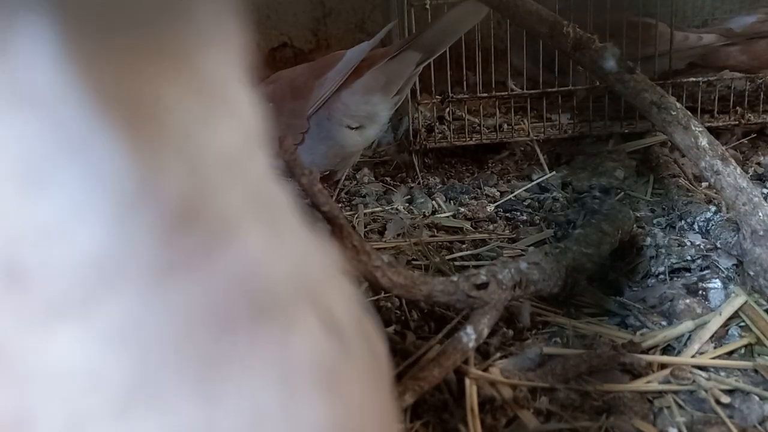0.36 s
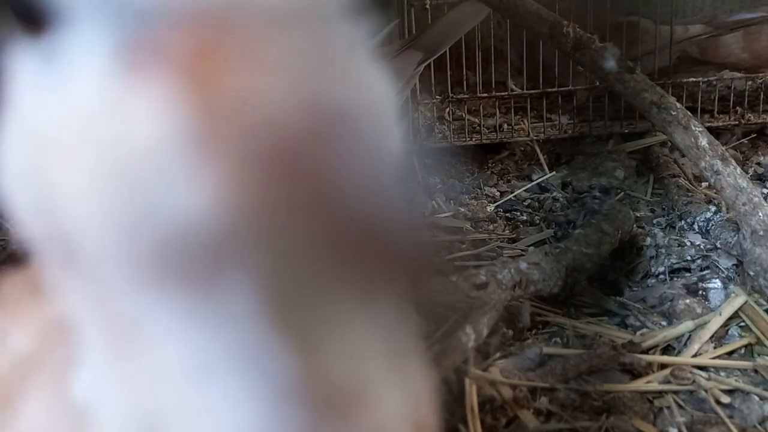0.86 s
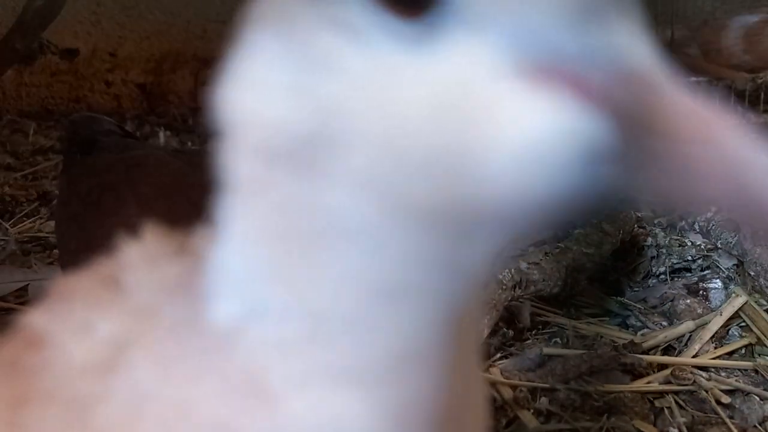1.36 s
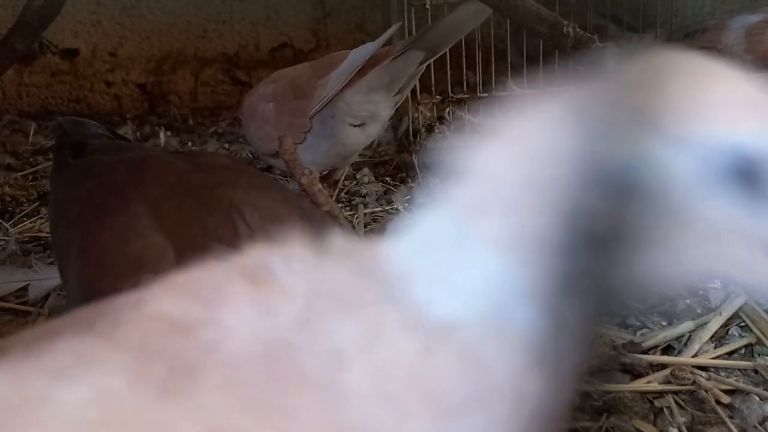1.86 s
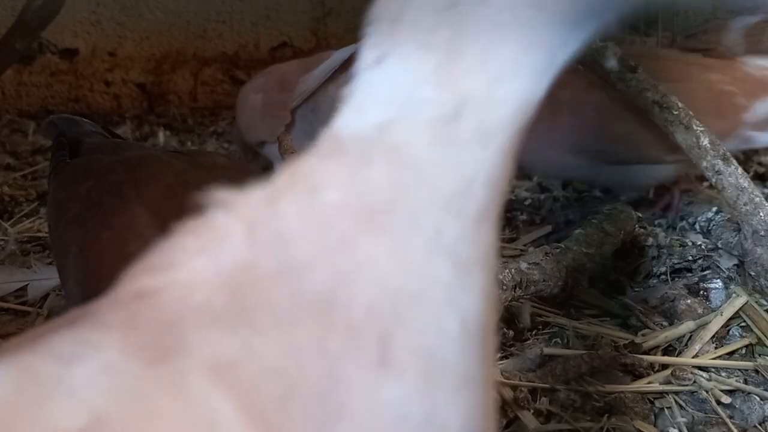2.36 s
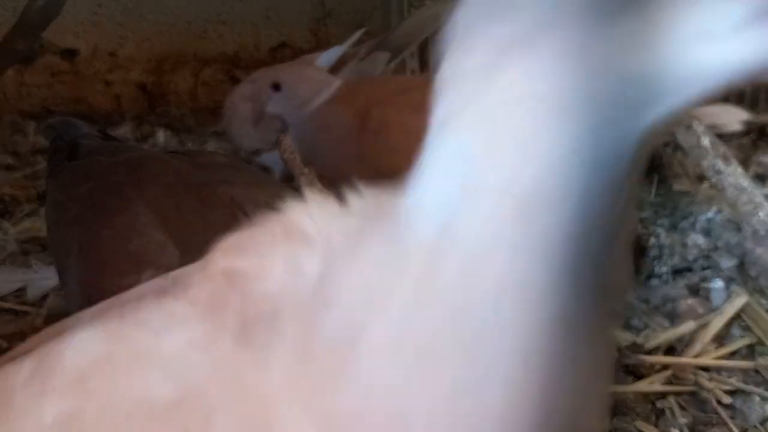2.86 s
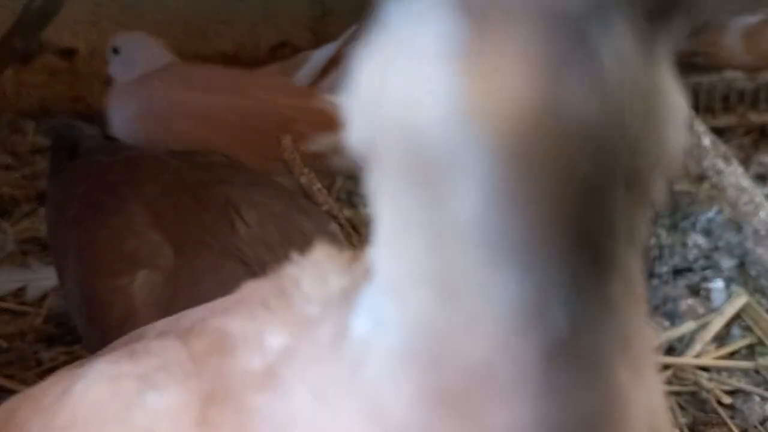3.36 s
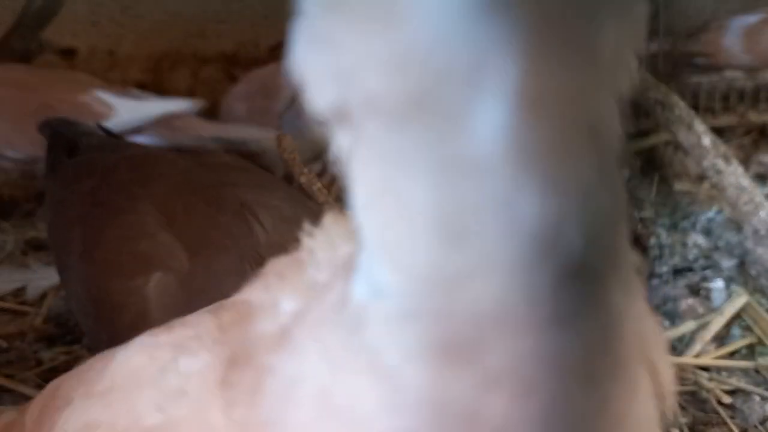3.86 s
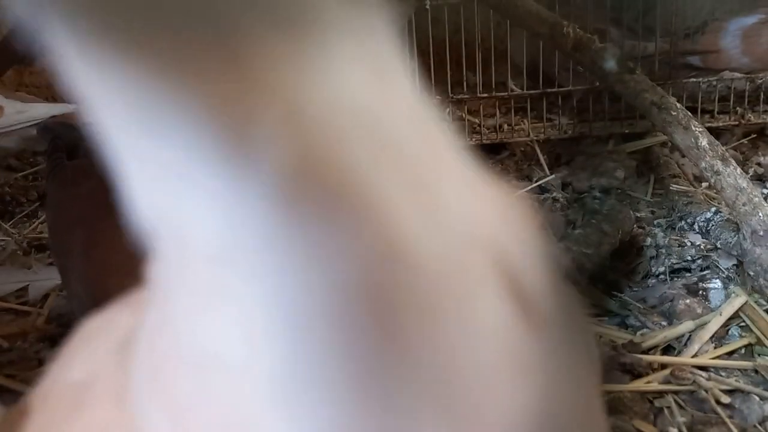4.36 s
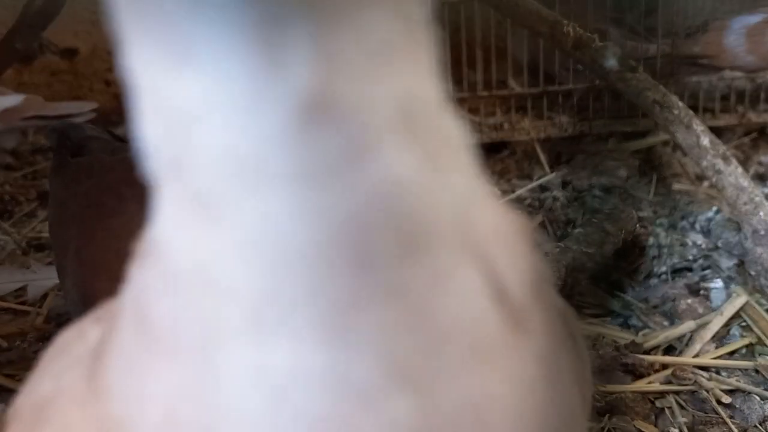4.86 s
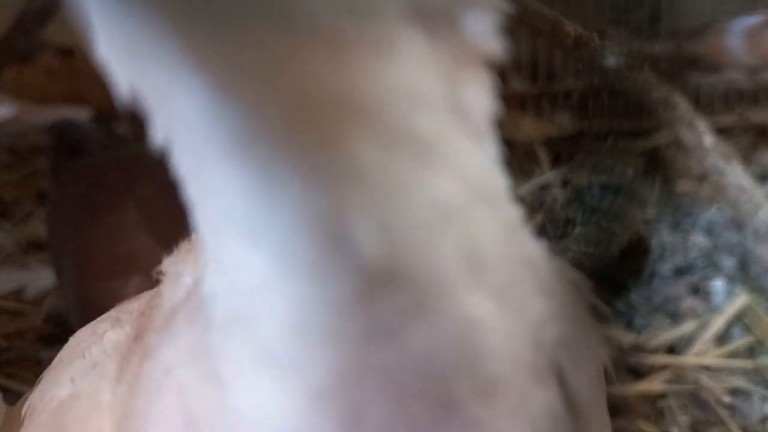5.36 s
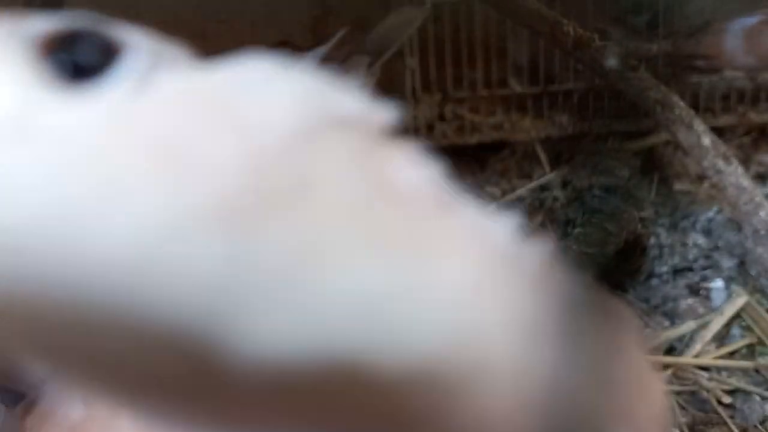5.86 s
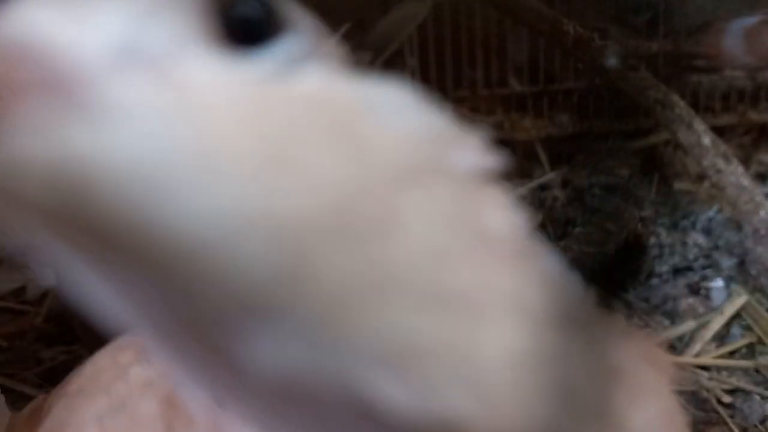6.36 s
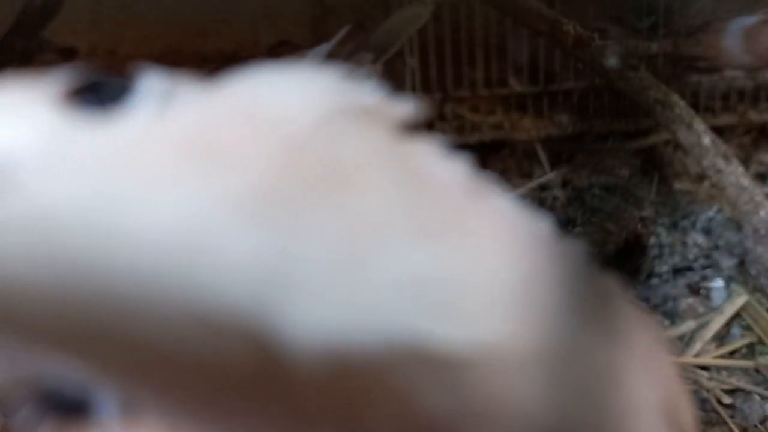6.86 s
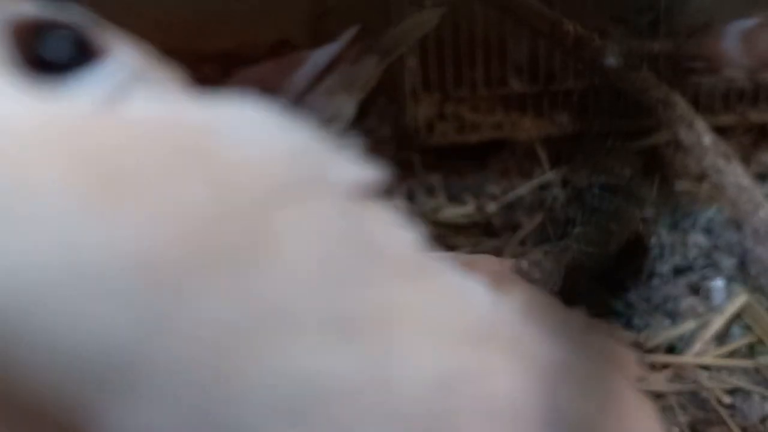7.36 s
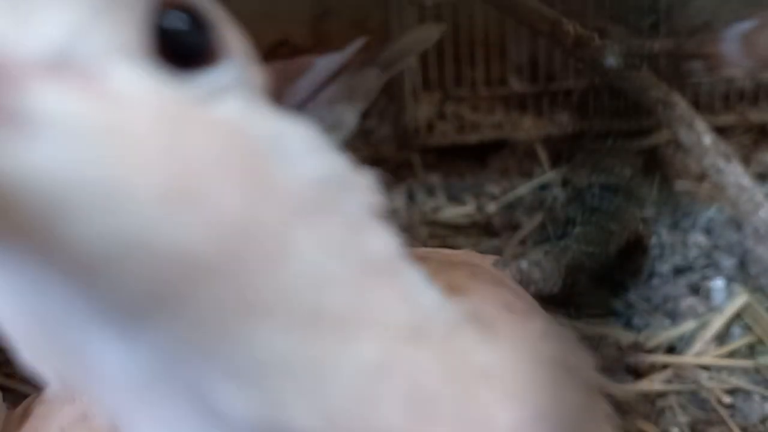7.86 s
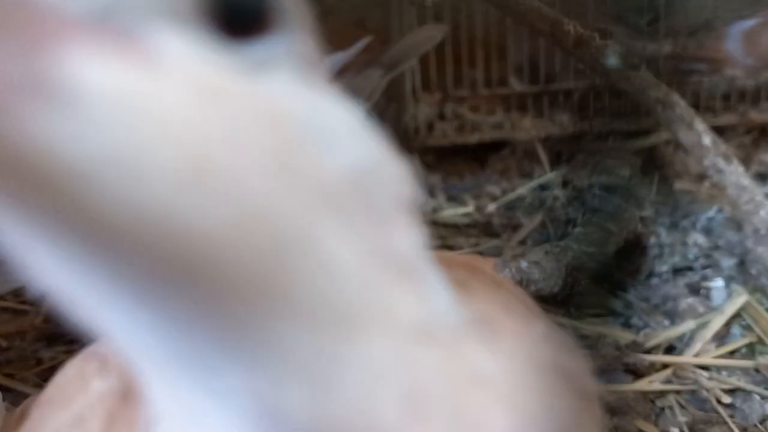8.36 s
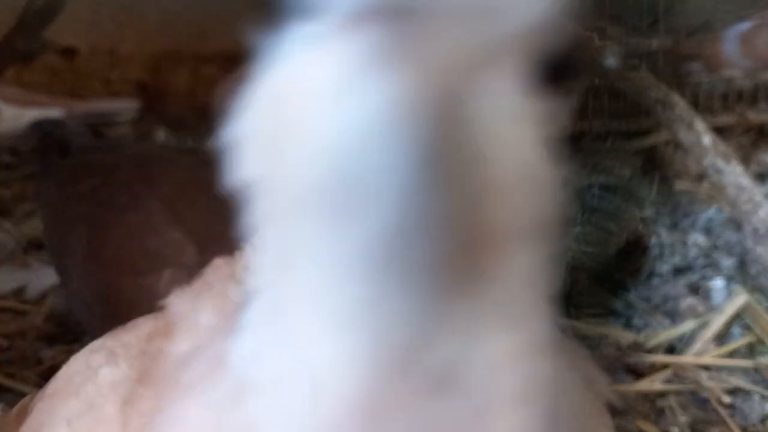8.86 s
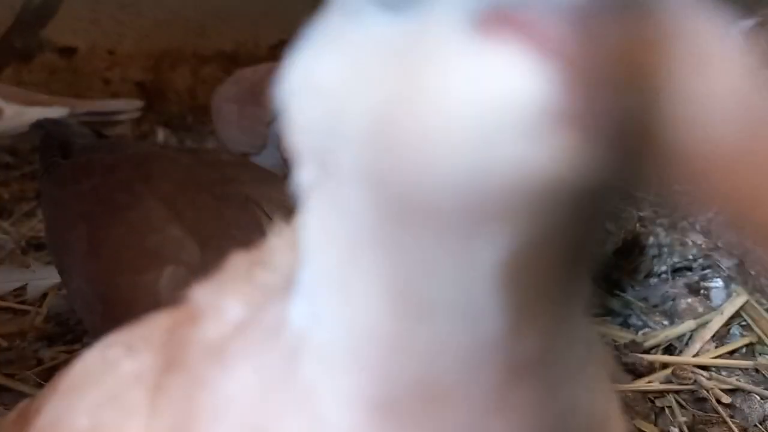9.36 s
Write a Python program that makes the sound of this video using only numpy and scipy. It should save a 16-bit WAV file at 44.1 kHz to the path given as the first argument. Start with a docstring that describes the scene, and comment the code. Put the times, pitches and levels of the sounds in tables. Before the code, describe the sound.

In a small straw-littered coop, a dove coos right at the microphone in a steady cycle of hoarse short note and rolling, whistling, falling coo. Feet and feathers tick and rustle in straw, with a sharp rustle and wooden knocks just before the second coo. Soft low coos from other birds and a few tiny chirps lie behind; faint hiss rises with each call and the background drops in pauses.

```python
"""A dove right at the microphone repeats a short hoarse note and a long coo that rolls, whistles high, dips and
sinks: a near sine, partly chopped into pulses, rings two resonances of the swollen throat. Further off, gliding
sines make pigeons' low coos and small birds' chirps. Feet and feathers tick and rustle in dry straw (noise bursts
and bands), hiss rises with the calls, knocks ring the modes of the perch, and coloured noise is the air of coop
and street. A noise gate turns the lower range down in pauses."""
import sys
import numpy as np
from scipy import signal
from scipy.io import wavfile
from scipy.ndimage import uniform_filter1d

SR = 44100
rng = np.random.default_rng(int(sys.argv[2]) if len(sys.argv) > 2 else 0)


def invert_db(level):
    """Linear amplitude ratio for a level in decibels (20 dB per decade), elementwise."""
    return 10 ** (np.asarray(level, dtype=float) / 20)


def store_pcm(level_fs):
    """Save levels as 16-bit WAV."""
    pcm = np.round(np.clip(level_fs, -1, 1) * 32767).astype(np.int16)
    wavfile.write(sys.argv[1], SR, np.atleast_2d(pcm).T)


N = 429524

# Short notes. Each row: start in seconds, length in seconds, dB added to the shape's effort.
NOTES = [(.303, .31, 0.5), (3.132, 0.29, 0.5), (5.943, .283, 1.5), (8.671, 0.31, 0)]
# Long coos. Each row: roll start in seconds, first pulse rate in pulses per second, then whistle, dip, swell,
# sinking and end times in seconds; in the last row those after the whistle lie past the end of the sound and
# are arbitrary.
COOS = [(.855, 48.8, 1.402, 1.659, 1.738, 1.982, 2.205), (3.69, 49.2, 4.27, 4.497, 4.577, 4.843, 5.015),
        (6.488, 50.6, 7.09, 7.321, 7.412, 7.636, 7.833), (9.207, 49, 9.81, 10.26, 10.05, 10.72, 10.65)]
# Shape of the short note. Each row: share of its length 0-1, pitch in Hz, effort in dB, share of each pulse
# that sounds 0-1.
NOTE_SHAPE = [(0, 452, -79, 0.75), (.04, 490, -33.5, 0.82), (.08, 561, -29, 0.85), (.12, 689, -25.5, 1),
              (.195, 702, -23.5, .95), (.225, 801, -22.5, .88), (.33, 779, -29.5, .9),
              (.365, 694, -18.5, .9), (.45, 671, -23, .84), (.66, 650, -22, .66), (.88, 643.5, -24.5, .66),
              (.945, 564.2, -39, .66), (1, 533, -57.5, 0.64)]
# Shape of the coo. Each row: stage (0-1 roll, 1-2 whistle, 2-3 dip, 3-4 swell, 4-5 sinking), pitch in Hz,
# effort in dB, share of each pulse that sounds 0-1.
COO_SHAPE = [(0, 515, -43.5, 0.24), (.12, 558.7, -32, 0.28), (.3, 610, -24.5, 0.34),
             (.47, 670, -20.5, 0.31), (.62, 689.2, -20.5, .38), (.72, 720, -23, .52), (.82, 765, -25, .66),
             (.95, 800.8, -25, .74), (1, 769.4, -23.5, .9), (1.13, 807.7, -20.5, 1),
             (1.57, 788.3, -23.5, 1), (1.92, 766.5, -24, 1), (2, 754, -45.5, 1), (2.07, 700.8, -26.5, 1),
             (2.25, 601, -21, 1), (2.45, 500.2, -31, 1), (2.66, 496, -33, 1), (2.82, 544.6, -21, 1),
             (3, 632.8, -20.5, 1), (3.15, 657.2, -21.5, 1), (3.4, 651.8, -21, 1), (3.8, 616.9, -18.5, 1),
             (4, 586.1, -17, 1), (4.055, 538.5, -28.5, 1), (4.36, 508, -28, 1), (4.46, 490, -35, 1),
             (4.62, 441.2, -36.5, .9), (4.7, 448.5, -42, .9), (4.74, 590.1, -41.5, .4), (4.9, 570, -48, .4),
             (5, 560, -72, .4)]
# Throat resonances. Each row: centre in Hz, width in Hz, level in dB, left minus right in dB, samples by which
# left lags.
THROAT = [(543.3, 23.94, 8.5, -2.5, 2.7), (660.3, 134.4, -7.5, 4.5, 9)]
# Overtones before muffling. Each row: multiple of the pitch, dB relative to effort at 800 Hz, power of pitch by
# which it grows.
OVERTONES = [(2, -39.5, -1.3), (3, -43.5, 14), (4, -46, 9), (5, -60, 9), (6, -47.5, 12), (7, -67, 0.1),
             (8, -66, 8.2)]
# Other birds, a gliding call a row. Each row: start in seconds, length in seconds, first Hz, last Hz,
# level in dB before wavering.
OTHERS = [(0, 0.18, 290, 353, -55), (0.128, 0.24, 340, 256, -43), (1.829, .24, 340.4, 243, -42),
          (2.197, 0.13, 569, 565, -59), (2.453, 0.39, 565, 570, -60), (2.882, 0.24, 556, 547, -60.5),
          (2.95, 0.42, 300, 329, -55), (3.869, 0.21, 335, 289.5, -52.5), (5.469, 0.16, 446, 408, -53.5),
          (5.479, 0.1, 1150, 1123, -49.5), (5.736, .12, 372, 256, -50), (8.08, 0.11, 5850, 5550, -79),
          (8.25, .09, 5020, 4980, -77), (8.649, 0.11, 5150, 4590, -79), (9.499, 0.29, 248.7, 284.6, -50)]
# Ticks in the straw, levels before band trims. Each row: start in seconds, peak in dB, dB near 1.6 kHz,
# dB near 11 kHz, left minus right in dB.
TICKS = [(0.2232, -49.5, -55.5, -64.5, 1), (0.2676, -40, -45, -55, 0), (0.39, -39, -44, -58.5, -2.5),
         (0.533, -50, -57.5, -67.5, 1), (0.7458, -49, -87, -62.5, -3), (0.9444, -49, -68, -70.5, 2.5),
         (1.4845, -35, -39.5, -54.5, -1), (1.6116, -45, -71.5, -63.5, 0.5),
         (1.8481, -42, -61.5, -46.5, -8.5), (2.0231, -37.5, -57.5, -56, 1), (2.2242, -38, -85.5, -59.5, 1),
         (2.3464, -51, -64, -59.5, -5.5), (2.652, -51, -63.5, -63, -12), (2.7162, -48, -69, -62.5, 2.5),
         (2.7555, -52.5, -79.5, -56, -1.5), (2.832, -36, -72, -49, 6), (3.463, -43, -59, -63, -0.5),
         (3.5043, -40, -50.5, -54, 0), (3.5349, -41, -54, -54.5, -4), (3.5694, -37.5, -46, -56, -2),
         (3.5905, -29.5, -36, -45, -0.5), (3.822, -54, -76, -68.5, 7), (3.9624, -46.5, -55.5, -63.5, -5),
         (4.27, -39.5, -53.5, -60, 13.5), (4.4367, -42.5, -57.5, -69, 2), (5.471, -45.5, -59, -61, 7.5),
         (5.872, -38, -51, -55, 2.5), (5.9919, -37, -58, -60.5, 5), (6.1519, -43.5, -64.5, -74, -2.5),
         (6.987, -40, -56.5, -64, 6.5), (7.6116, -45, -66, -61, 0.5), (8.8576, -50.5, -70.5, -68, -1),
         (9.1226, -49.5, -79.5, -86.5, 3), (9.1706, -50, -78.5, -89, -2), (9.2813, -45.5, -87.5, -68, -7.5),
         (9.323, -45, -70.5, -62.5, -5.5), (9.6844, -46, -60.5, -62, -4)]
# Spectrum of the straw rustle. Each row: Hz, density in dB.
STRAW = [(1290, -31.5), (2200, -4.5), (2930, -9), (3860, -4.5), (6660, 0), (7300, -16), (9500, -12.5),
         (12400, -41.5), (20900, -120)]
# Stirring of birds in the straw. Each row: time in seconds, level in dB before the band offsets.
STIR = [(0, -92), (.35, -80), (.7, -89), (1.3, -83.5), (1.75, -69.5), (2.1, -79.5), (2.45, -81),
        (2.82, -72.5), (3.05, -82), (3.48, -76.5), (3.54, -66), (3.6, -57), (3.655, -72), (4.2, -79.5),
        (4.8, -78.5), (5.38, -92.5), (5.5, -68), (5.65, -87), (5.9, -78), (6.3, -87.5), (7, -82.5),
        (7.7, -82), (8.1, -91.5), (8.6, -91.5), (9.3, -79), (9.74, -83)]
# Rustle and hiss, in columns: near 5 kHz, near 1.5 kHz, near 13 kHz.
# Background hiss rises while the dove calls, as the recorder's gate opens: lift in dB.
CALLING_LIFT_DB = (6.5, 12, 3.5)
# Band level over the mean stirring in dB.
STIR_OFFSET_DB = (0.4, -2.5, -1)
# How far the band follows the stirring, as a share.
STIR_SHARE = (0.81, 1, 1)
# Blows on the perch. Each row: time in seconds, peak of the blow in dB.
KNOCKS = [(3.543, -34), (3.571, -30), (3.592, -17.5), (3.67, -44), (5.995, -37), (6.988, -40)]
# Modes of the perch. Each row: Hz, level in dB, t60 in seconds.
PERCH = [(120.5, -6, 0.15), (206, -0.5, 0.023), (415.3, -4.5, 0.018), (650, -2, 0.017),
         (1055, -0.5, 0.0083), (2250, -7.5, 0.0052)]
# Spectrum of coop and street air. Each row: Hz, density in dB.
AIR = [(18, -64), (30, -31.5), (86, -6), (134, -3.5), (157, -10.5), (189, 0), (259, -12), (303, 4),
       (394, -9.5), (616, -19.5), (3980, -44), (4900, -31.5), (6600, -32), (7300, -46), (16000, -43.5)]
# Left-right likeness of noise. Each row: Hz, likeness 0-1.
LIKENESS = [(60, 0.82), (200, 0.92), (400, 0.64), (1500, 0.01)]

AIR_DB = -57.5
HOARSE_PULSES_PER_S = 75  # nominal, drifts
ROLL_SLOWING = 51  # pulses per s lost, times the square of the seconds rolled
LEAK_DB, LEAK_PAN_DB = -32.5, 3.5
OVERTONE_PAN_DB, OVERTONE_LAG_SAMPLES = -6.5, 6.5
OTHERS_RISE, OTHERS_FALL = .25, .4  # shares of a call
SMALL_TICKS_PER_S, SMALL_TICK_BASE_DB = 3.2, -59
STRAW_EDGE_HZ = 7100
COOP_T60_S, COOP_DB = .11, -28
GATE_DB, GATE_DEPTH_DB, GATE_KNEE_DB, GATE_FALL_DB_PER_S = -54.5, 12, 16, 148
GATE_TOP_HZ, MICROPHONE_CUT_HZ = 1850, 24


def rms_one(x):
    """Scale to rms 1."""
    return x / np.sqrt(np.mean(x ** 2) + 1e-20)


def in_time(rows, left=None, right=None):
    """Columns of a curve, sample by sample."""
    s, *columns = np.transpose(rows)
    return [np.interp(np.arange(N) / SR, s, c, left, right) for c in columns]


def at_hz(points, hz):
    """Read a spectrum on a log axis."""
    point_hz, value = np.array(points).T
    return np.interp(np.log(hz), np.log(point_hz), value)


def drift(rate_hz):
    """Slow chance with rms 1: white noise through a double pole, drawn every 40 samples."""
    r = np.exp(-80 * np.pi * rate_hz / SR)
    white = rng.standard_normal(N // 40 + 2002)
    slow = signal.lfilter([1], [1, -2 * r, r * r], white)[2000:]
    return np.interp(np.arange(N) / 40, np.arange(len(slow)), rms_one(slow))


def pan(x, db, lag=0):
    """Spread over two channels: left minus right in dB, left late by lag samples."""
    at = np.arange(N)
    left = np.interp(at - lag / 2, at, x) * invert_db(db / 2)
    right = np.interp(at + lag / 2, at, x) * invert_db(-db / 2)
    return np.array([left, right])


def resonance(x, hz, width_hz):
    """Two-pole band-pass with gain 1 on top."""
    r = np.exp(-np.pi * width_hz / SR)
    zeros = np.array([1, 0, -1]) * (1 - r * r) / 2
    return signal.lfilter(zeros, [1, -2 * r * np.cos(2 * np.pi * hz / SR), r * r], x + 1e-18)


def band(x, low_hz, high_hz):
    """Butterworth band-pass."""
    edges_hz = [low_hz, min(high_hz, .45 * SR)]
    return signal.sosfilt(signal.butter(2, edges_hz, "band", fs=SR, output="sos"), x)


def coloured_noise(spectrum, patchy_db):
    """Half-octave bands of stereo noise, each flickering on its own; rms 1."""
    out, edges_hz = 0, 30 * 2 ** np.arange(0, 9.6, .5)
    white = rng.standard_normal((2, 2, N))
    for k, (low_hz, high_hz) in enumerate(zip(edges_hz, edges_hz[1:])):
        hz = np.sqrt(low_hz * high_hz)
        mid, side = band(white[k % 2], low_hz, high_hz)
        alike = np.clip(at_hz(LIKENESS, hz), 0, 1)
        gain = invert_db(at_hz(spectrum, hz) + patchy_db * drift(5.9))
        out = out + gain * (np.sqrt(1 + alike) * mid + np.sqrt(1 - alike) * side * [[1], [-1]])
    return rms_one(out)


def air():
    """Coop and street: steady coloured noise with slow flicker in each band."""
    return invert_db(AIR_DB) * coloured_noise(AIR, patchy_db=3.0)


def coop(x):
    """Walls answer with short dying noise, unlike left and right."""
    t = np.arange(SR // 2) / SR
    walls = rng.standard_normal((2, len(t))) * invert_db(-60 * t / COOP_T60_S)
    walls /= np.sqrt(np.sum(walls ** 2, axis=1, keepdims=True))
    return invert_db(COOP_DB) * signal.fftconvolve(x.mean(axis=0)[None], walls, axes=1)[:, :N]


def other_birds():
    """Soft wavering sines that glide, swell and fade: low coos and high chirps."""
    out, unsteady = np.zeros(N), 1 + .02 * drift(30)
    for s, length_s, first_hz, last_hz, db in OTHERS:
        at = (np.arange(N) / SR - s) / length_s
        swell = np.clip(np.minimum(at / OTHERS_RISE, (1 - at) / OTHERS_FALL), 0, 1)
        glide_hz = first_hz + (last_hz - first_hz) * np.clip(at, 0, 1)
        phase = 2 * np.pi * np.cumsum(glide_hz * unsteady) / SR
        out += swell * invert_db(db) * np.sin(phase)
    return pan(out * invert_db(2.8 * drift(63)), -2.0, 18)


def rustle_and_hiss():
    """Flickering dry noise in three bands follows the stirring; its hiss rises during each call."""
    *rest, in_note, in_coo = voice()
    stir_db, calling = in_time(STIR)[0], uniform_filter1d(in_note + in_coo, size=3000)
    mean_db = stir_db.mean()
    treble_db, middle_db, top_db = [mean_db + share * (stir_db - mean_db) + db + lift_db * calling
                                    for share, db, lift_db in zip(STIR_SHARE, STIR_OFFSET_DB, CALLING_LIFT_DB)]
    straw = band(coloured_noise(STRAW, patchy_db=3.0), 1500, STRAW_EDGE_HZ)
    treble = invert_db(treble_db + 1.2 * drift(40)) * straw
    middle = invert_db(middle_db + 3.1 * drift(20)) * rms_one(band(rng.standard_normal((2, N)), 600, 1400))
    top = invert_db(top_db + 1.8 * drift(40)) * rms_one(band(rng.standard_normal((2, N)), 11000, 15000))
    return treble + middle + top


def small_ticks():
    """Rows of faint ticks at chance moments, stronger when the birds stir."""
    at, size, dull, side = rng.random((round(SMALL_TICKS_PER_S * N / SR), 4)).T
    s, (stir_db,) = at * N / SR, in_time(STIR)
    db = SMALL_TICK_BASE_DB + 0.72 * (stir_db[(at * N).astype(int)] - stir_db.mean()) + 9 * size
    return list(zip(s, db, db - 7.5 - 22 * dull, db - 24 + 12 * dull, 16 * (side - .5)))


def ticks():
    """Each tick is a clump of tiny snaps in a short swish, in three bands of their own strength."""
    out, t = np.zeros((2, N + 4000)), np.arange(4000) / SR
    for s, peak_db, middle_db, top_db, side_db in TICKS + small_ticks():
        born = (rng.random(4000) < 130 * np.exp(-t / .025) / SR) * rng.uniform(0.13, .7, 4000)
        born[0] = .9
        snaps = signal.lfilter([1], [1, -np.exp(-1 / (0.0014 * SR))], born)
        swish = .55 * np.minimum(t / 0.0045, 1) * np.exp(-t / 0.017)
        noise = rng.standard_normal((2, 4000)) * (snaps + swish)
        tick = invert_db(peak_db - 3.5) * band(noise, 3700, 6900)
        tick += invert_db(top_db + 12.0) * band(noise, 11000, 15000)
        tick += invert_db(min(middle_db, peak_db - 3.5) + 11.5) * band(noise, 610, 2100)
        start = round(s * SR)
        out[:, start:start + 4000] += tick * invert_db(np.array([[.5], [-.5]]) * side_db)
    return out[:, :N]


def knocks():
    """Blows on the wooden perch ring its few dull modes."""
    blows = np.zeros(N)
    blows[[round(s * SR) for s, db in KNOCKS]] = invert_db(np.array(KNOCKS)[:, 1])
    out = 0
    for hz, db, t60_s in PERCH:
        r, w = invert_db(-60 / (t60_s * SR)), 2 * np.pi * hz / SR
        out = out + signal.lfilter([0, invert_db(db) * np.sin(w)], [1, -2 * r * np.cos(w), r * r], blows + 1e-18)
    return pan(band(out, 140, 7600), 0.71, 12.0)


def voice():
    """Lay the shapes out in time: pitch, effort, sounding share, and where note and coo run."""
    notes = [[(s + length_s * at, hz, db + level_db, share) for at, hz, db, share in NOTE_SHAPE]
             for s, length_s, level_db in NOTES]
    coos = [[(np.interp(at, range(6), [s, *stages]), hz, db, share) for at, hz, db, share in COO_SHAPE]
            for s, rate, *stages in COOS]
    in_note, in_coo = [sum(in_time(call, left=0, right=0)[0] > 0 for call in calls) * 1.
                       for calls in (notes, coos)]
    return *in_time(sorted(sum(notes + coos, []))), in_note, in_coo


def pulse_count():
    """Pulses so far: uneven and fast in the note, nearly steady and slowing in the roll."""
    count = np.cumsum(HOARSE_PULSES_PER_S * invert_db(3.9 * drift(25))) / SR
    wobble = .07 * drift(14) + 0.14
    for k, (s, rate, whistle_s, *rest) in enumerate(COOS):
        t = np.arange(N) / SR - s
        steady = rate * t - ROLL_SLOWING * t ** 3 / 3
        rolling = (t >= 0) & (t < whistle_s - s)
        count = np.where(rolling, steady + wobble + 1000 * (k + 1), count)  # 1000s: own chance per roll
    return count


def throat(tone, puff):
    """Two narrow resonances of the swollen throat, of opposite sign, driven by tone and air puffs."""
    (hz, width_hz, db, side_db, lag), (hz2, width2_hz, db2, side2_db, lag2) = THROAT
    drive = tone + band(puff, 420, 850)
    low = invert_db(db) * resonance(drive, hz, width_hz)
    # twice: falls steeply above
    high = invert_db(db2) * resonance(resonance(drive, hz2, width2_hz), hz2, width2_hz)
    return pan(low, side_db, lag) - pan(high, side2_db, lag2)


def dove():
    """A near sine, chopped into pulses, sets the throat ringing; overtones leak out past it."""
    pitch_hz, effort_db, share, in_note, in_coo = voice()
    calling = uniform_filter1d(in_note + in_coo, size=400)
    count, share = pulse_count(), np.clip(share, .1, 1)
    within, chopped = count % 1, np.clip((.88 - share) * 12, 0, 1)
    strength, kick = rng.standard_normal((5000, 2))[count.astype(int)].T  # one draw a pulse
    sounding = np.clip(np.minimum(within / 0.12, (share - within) / 0.12), 0, 1)
    effort = invert_db(effort_db + chopped * strength * 3.06) * calling
    gain = uniform_filter1d(effort * (1 - chopped + chopped * sounding), size=70) * np.sqrt(2)
    # each pulse starts sharp and settles
    overshoot = 1 + uniform_filter1d(chopped * .17 * np.exp(-within / .1), size=110)
    phase = 2 * np.pi * np.cumsum(pitch_hz * overshoot * (1 + .001 * drift(27))) / SR
    tone = gain * np.sin(phase)
    # air bursts through at each opening
    opens = np.diff(np.floor(count), prepend=0) == 1
    puff = uniform_filter1d(opens * chopped * effort * (1 + 0.14 * kick), size=30) * invert_db(24)
    upper = 0
    for k, level_db, power in OVERTONES:
        growth = (pitch_hz / 800) ** np.clip(power, -4, 14)
        upper = upper + invert_db(level_db + 2.2 * drift(22)) * growth * np.sin(k * phase)
    # hoarse parts are muffled
    muffle_db = -9 * chopped * in_coo - 5.8 * in_note + 2.9 * in_note * drift(65)
    upper = upper * uniform_filter1d(gain, size=330) * invert_db(muffle_db)
    upper = upper - 0.41 * resonance(upper, 1120, 120)  # the closed windpipe swallows one band
    leak = pan(invert_db(LEAK_DB) * band(tone, 200, 980), LEAK_PAN_DB)
    return throat(tone, puff) + leak + pan(upper, OVERTONE_PAN_DB, OVERTONE_LAG_SAMPLES)


def scene():
    """All sources; dove and knocks also excite the coop."""
    near = dove() + knocks()
    return near + coop(near) + other_birds() + ticks() + rustle_and_hiss() + air()


def low_pass(x):
    """Removes everything above the highest recorded frequency."""
    return signal.sosfilt(signal.butter(12, 16520, fs=SR, output="sos"), x)


def record(dry):
    """A gate on the lower range opens on sound above 600 Hz and closes slowly; then a bass cut."""
    heard = band(dry.mean(axis=0), 600, 14000)
    level_db = 10 * np.log10(uniform_filter1d(heard ** 2, size=600) + 1e-12)
    slope_db = GATE_FALL_DB_PER_S * np.arange(N) / SR
    held_db = np.maximum.accumulate(np.minimum(level_db, GATE_DB) + slope_db) - slope_db
    closed = np.clip((GATE_DB - held_db) / GATE_KNEE_DB, 0, 1)
    lows = signal.sosfilt(signal.butter(1, GATE_TOP_HZ, fs=SR, output="sos"), dry)
    gated = dry - lows * (1 - invert_db(-GATE_DEPTH_DB * uniform_filter1d(closed, size=900)))
    bass_cut = signal.butter(2, MICROPHONE_CUT_HZ, "high", fs=SR, output="sos")
    return low_pass(signal.sosfilt(bass_cut, gated))


dry = scene()
out = record(dry)
store_pcm(out)
```